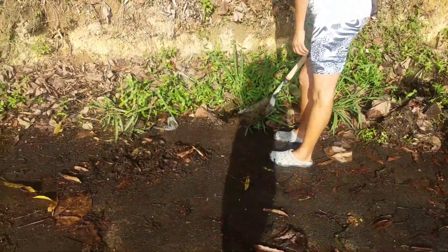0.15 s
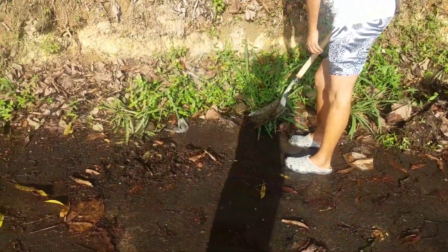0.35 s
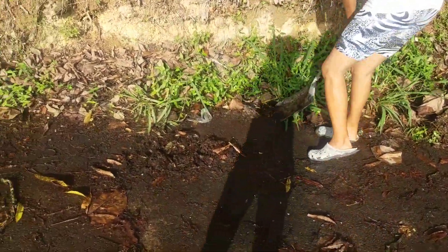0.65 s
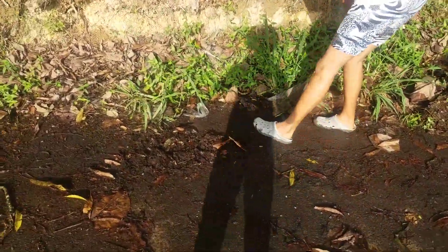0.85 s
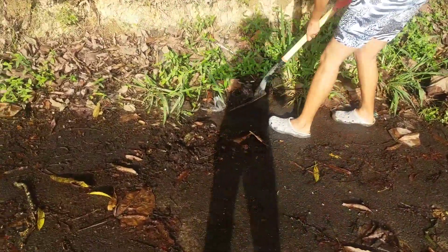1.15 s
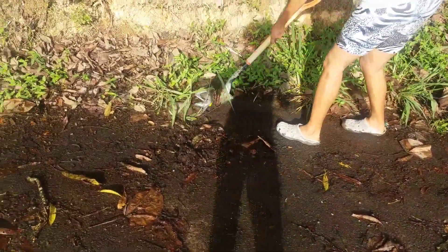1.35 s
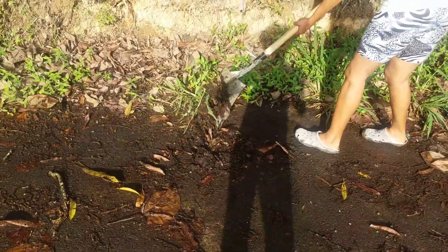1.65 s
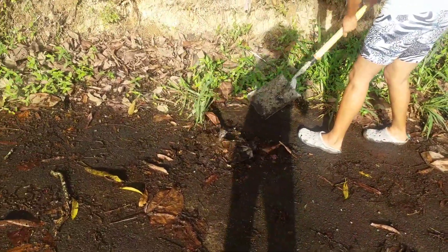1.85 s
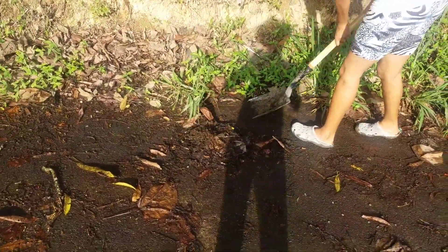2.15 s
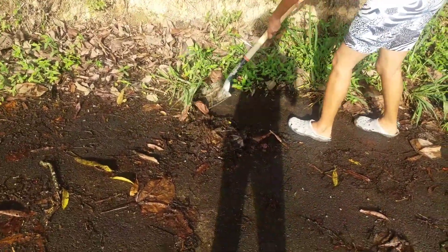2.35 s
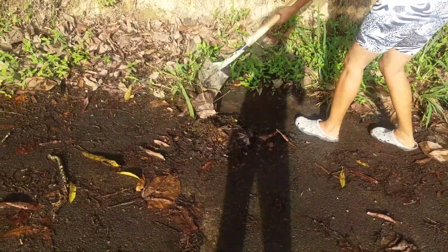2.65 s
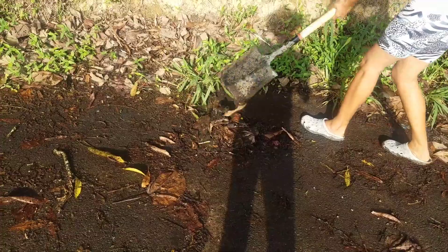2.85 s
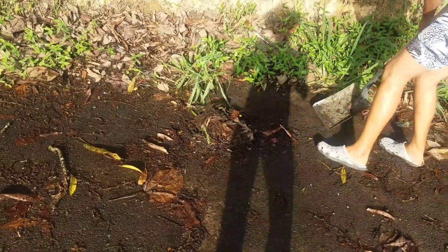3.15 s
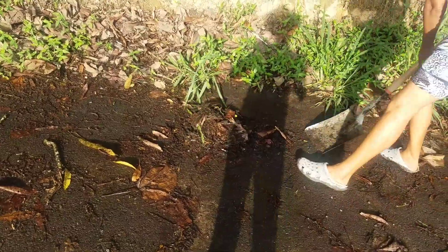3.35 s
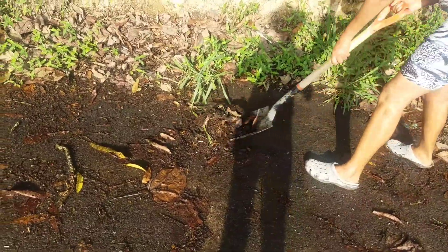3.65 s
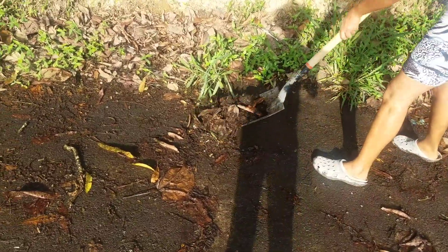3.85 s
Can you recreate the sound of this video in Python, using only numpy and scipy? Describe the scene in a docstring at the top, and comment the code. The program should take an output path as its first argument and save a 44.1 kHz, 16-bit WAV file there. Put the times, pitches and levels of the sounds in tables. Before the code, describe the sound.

A steel shovel scrapes wet soil and leaves about two metres away, slightly left. Small crunches come at 0.1 and 0.7 s, then gritty, dully ringing scrapes at 0.85-1.4, 2.0-2.4 and 3.25-3.7 s. Knocks begin the second and third; a crunch and soft low thud land near 3.2 s. Crumbs trickle faintly between strokes over quiet outdoor air and faint insects.

```python
"""By a road outdoors, a steel shovel is pushed three times through wet soil and leaves, a couple of metres away.
Scrape: grains of noise ring the soil-damped modes of the blade and add a gritty hiss.
Knocks: short pushes ring the same modes, and one soft thud is a low tone that sags.
Crunches and trickle: bursts and streams of noise grains for clods, crumbs and leaves, mostly between strokes.
Behind them lies a quiet outdoor hush: shaped noise with a faint insect band."""
import sys
import numpy as np
from scipy import signal
from scipy.fft import rfft, irfft
from scipy.io import wavfile
from scipy.ndimage import uniform_filter1d

SR = 44100
rng = np.random.default_rng(int(sys.argv[2]) if len(sys.argv) > 2 else 0)


def generate_wav(sig):
    """Save sig (samples, or channels by samples) to the path in sys.argv[1] as 16-bit PCM at SR."""
    pcm = np.round(np.clip(np.atleast_2d(sig).T, -1, 1) * 32767).astype(np.int16)
    wavfile.write(sys.argv[1], SR, pcm)


N = 176400  # 4 s of samples
T = np.arange(N) / SR  # time, s
F = np.maximum(np.arange(N // 2 + 1) * SR / N, 1)  # frequency, Hz

# All levels apply before the stereo balance and the final filters.
# The three pushes of the shovel. Each row: time in seconds, level of the blade's upper ring in dB.
STROKES = [
    [(0.836, -67), (0.843, -41.5), (0.872, -44.5), (0.885, -61), (0.907, -52), (0.911, -42.5), (0.978, -42),
     (1.015, -31.5), (1.04, -40.5), (1.11, -31), (1.18, -33.5), (1.21, -32), (1.29, -38), (1.335, -45),
     (1.39, -47.5), (1.42, -74)],
    [(1.99, -50.5), (2.05, -47.5), (2.08, -34.5), (2.14, -29.5), (2.24, -29.5), (2.29, -29), (2.32, -35.5),
     (2.36, -44.5), (2.405, -50), (2.43, -68)],
    [(3.251, -42.5), (3.285, -41.5), (3.315, -33), (3.37, -32.5), (3.41, -28.5), (3.46, -28.5), (3.55, -29),
     (3.63, -33.5), (3.65, -49), (3.69, -58), (3.74, -74)],
]
# How far each stroke sits to the left: left over right in dB, one value per stroke.
STROKE_PANS = [3, 3, 3]
# Colour as the blade loads, one list per stroke. Each row: time in seconds, then the low ring, the middle
# ring and the grit hiss in dB relative to the upper ring, then how far the higher modes outweigh the
# lower ones inside the middle ring in dB, and the same inside the upper ring in dB.
LOADING = [
    [(0.93, -34, -8, -0.3, 2.5, 0.5), (1.05, -11.5, -5.5, 0.9, -3, -5), (1.2, -15, -8.5, -1.5, 6.5, 7),
     (1.32, -10.5, -2, 4, -9, -1.5), (1.4, -14, 8, -9, -7, 8)],
    [(2.03, -9, -2.5, -4, 3, 7), (2.12, -19, -14, 0, 1, -0.5), (2.25, -17, -6, -2, 5.5, 3),
     (2.4, -12.5, -8.5, 2, -4, 1)],
    [(3.27, -10.5, 3, -3.5, 3.5, 0), (3.4, -7, -3, -3.5, -1, -3), (3.55, -9.5, -5, -1, 4.5, 2),
     (3.66, -24, -7, -1.5, 2, -2)],
]
# Stones that snag the edge. Each row: time in seconds, size of the added burst in dB over the stroke's level.
SNAGS = [(0.912, 12), (0.92, 5), (0.937, 7), (0.961, 7), (0.985, 14), (1.007, -2), (1.153, 0), (1.355, 9),
         (2.336, 2), (3.4, 3.5), (3.583, 2)]
SNAG_DECAY_S = 0.0054

# Ringing modes of the blade. Each row: pitch in Hz, relative level in dB,
# time to fade by 60 dB in seconds when the blade hangs free.
BLADE_MODES = [(375, -5.5, 0.14), (397.7, -4, 0.21), (476, -12.5, 0.19), (653, 2.5, 0.037),
               (718, 1.5, 0.058), (879, 0, 0.089), (896.4, -1.5, 0.11), (1154, 9, 0.13), (1547, 6.5, 0.22),
               (1803, 4.5, 0.13), (1868, 6.5, 0.12), (2072, 1, 0.24), (2260, 4, 0.081)]
SOIL_DAMPING = 1.7  # fade times are divided by this during the scrape
LOW_TOP_HZ, MIDDLE_TOP_HZ = 550, 1050  # borders of the three groups of modes
MIDDLE_SPLIT_HZ, UPPER_SPLIT_HZ = 790, 1700  # where weight shifts inside a group
MODE_FLICKER_DB = 7  # dB per unit of walk()
RUMBLE_DB = 1.5  # broad noise between the modes, relative to the ringing
SCRAPE_LOW_HZ = 215  # the scrape is thinned below this
# Colour of the noise between the modes. Each row: frequency in Hz, relative level in dB.
EDGE_COLOUR = [(130, -32.5), (250, -14.5), (400, 9), (540, -25), (850, -4), (1100, -16.5), (1600, -7),
               (2800, -17.5)]
# Colour of grit hiss and of all crisp treble. Each row: frequency in Hz, relative level in dB.
GRIT_COLOUR = [(2000, -6.5), (2750, -9.5), (3300, -8), (5500, -10.5), (8000, -17), (10300, -16.5),
               (14000, -10), (16000, -14)]

# Knocks of the blade. Each row: time in seconds, level in dB, time for the push to peak in seconds,
# damping that divides the fade times (0.3 at least), pitch in Hz of the modes the struck spot favours.
KNOCKS = [(0.737, -46.5, 0.00013, 0.39, 920), (0.741, -53, 0.000091, 1.2, 1535),
          (1.958, -24, 0.00013, 1.37, 772), (2.639, -58.5, 0.00011, 1.7, 914),
          (3.2475, -28, 0.00011, 2.9, 873)]
FAVOUR_DB_PER_OCTAVE, FAVOUR_FLOOR_DB = -51.5, -20  # loss of modes away from the favoured pitch
KNOCK_CLICK_DB = -20
# The loaded blade drops on soft ground.
THUD_S, THUD_DB, THUD_HZ, THUD_T60_S = 3.1945, -24, 400, 0.02
THUD_SAG = 18  # per second; larger makes the pitch fall faster

# Crunches of clods and leaves. Each row: time in seconds, length in seconds, level in dB,
# centre of the band in Hz, treble relative to that level in dB.
CRUNCHES = [(.0, 0.029, -60, 740, -3), (.099, 0.0011, -32.5, 1690, -26), (0.108, 0.008, -40, 1380, -6.5),
            (0.117, 0.033, -35, 2330, -11), (0.357, 0.095, -66.5, 1310, -18), (0.5, 0.03, -66, 1520, -3),
            (0.561, 0.0079, -59, 1390, 0), (.655, 0.031, -52.5, 1620, -13),
            (0.669, 0.0058, -45.5, 1440, -1.5), (0.694, 0.06, -49.5, 2240, -12.5),
            (.719, 0.0037, -48.5, 2070, -1), (1.732, 0.047, -59.5, 1640, 3),
            (1.784, 0.018, -53.5, 1320, -0.5), (2.769, 0.0066, -59.5, 1530, 0.5),
            (2.894, 0.003, -53.5, 1600, -20), (2.814, 0.018, -53.5, 1640, -6.5),
            (2.925, 0.033, -49, 1960, -12), (3.068, 0.0064, -48, 1360, -24),
            (3.181, 0.015, -34.5, 2400, -10), (3.197, 0.0023, -27, 1750, -9), (3.2, 0.039, -48, 1920, -7.5),
            (3.512, 0.0061, -38.5, 2540, 17)]
CRUNCH_WIDTH, CRUNCH_TAIL_S = 0.25, 0.0068  # band reaches a factor of 1.25 each way
# Soil sliding off and leaves rustling, one list per stretch. Each row: time in seconds,
# level in dB, treble level in dB.
TRICKLE = [
    [(0.03, -67, -74), (0.2, -106, -94), (0.62, -76, -73), (0.8, -65, -69)],
    [(1.385, -65, -59.5), (1.5, -68.5, -59.5), (1.6, -73, -72), (1.7, -71, -68.5), (1.83, -78, -74),
     (1.93, -106, -103)],
    [(2.4, -66.5, -69), (2.55, -59, -54), (2.63, -70, -67.5), (2.87, -70.5, -71.5), (3.12, -67, -70),
     (3.16, -109, -96)],
    [(3.7, -80, -68), (3.8, -67.5, -69), (3.97, -74, -69.5)],
]
# Colour of the trickle's lower part. Each row: frequency in Hz, relative level in dB.
TRICKLE_COLOUR = [(300, -1.5), (700, 1), (1500, 6), (2500, -5), (3500, -80)]

# Colour of the outdoor air. Each row: frequency in Hz, relative level in dB.
HUSH_COLOUR = [(22, 1), (65, 10.5), (150, -0.5), (400, -2), (900, -6), (1700, -7.5), (5000, -16.5),
               (8000, -25.5), (13000, -18.5), (16000, -15.5)]
HUSH_DB = -66.5
INSECT_HZ, INSECT_WIDTH_HZ, INSECT_DB = 6260, 1500, -78.5  # width is on each side
INSECT_WAVER_DB = 1.5  # dB per unit of walk()

# How alike the two ears hear a nearby source. Each row: frequency in Hz, likeness from 0 to 1.
LIKENESS = [(60, 0.5), (300, 0.92), (800, 0.95), (1500, 1), (3000, 0), (15000, 0)]
# Stereo balance. Each row: frequency in Hz, left over right in dB.
BALANCE = [(60, -1.7), (1200, 3), (2500, 1), (5000, -1.5), (14000, -2.5)]
LEFT_LAG_S = 0.00011
MIC_LOW_HZ, MIC_TOP_HZ = 48.7, 15850


def undb(db):
    """Turn dB into a gain."""
    return 10 ** (np.asarray(db) / 20)


def unit(x):
    """Scale to an rms of 1."""
    return x / np.sqrt(np.mean(x ** 2))


def on_log(points, hz=F):
    """Read (Hz, value) points along a logarithmic frequency axis."""
    p = np.array(points, float)
    return np.interp(np.log(hz), np.log(p[:, 0]), p[:, 1])


def keep_band(x, low_hz, high_hz):
    """Keep only the frequencies from low_hz up to high_hz."""
    return irfft(rfft(x) * ((F >= low_hz) & (F < high_hz)), N)


def colour(x, points):
    """Shape by (Hz, dB) points, silent outside them; white noise of rms 1 keeps about that rms."""
    inside = (F >= points[0][0]) & (F <= points[-1][0])
    gain = undb(on_log(points)) * inside
    return irfft(rfft(x) * unit(gain), N)


def ring(x, hz, t60):
    """One mode set ringing by x, a tone that fades by 60 dB in t60 seconds."""
    pole = np.exp(2j * np.pi * hz / SR - np.log(1000) / (t60 * SR))
    return signal.lfilter([1], [1, -pole], x).imag


def walk(rate):
    """Random levels, about rate new ones a second, with smooth steps; their spread is near a half."""
    held = int(SR / rate)
    levels = np.repeat(rng.standard_normal(N // held + 1), held)
    return 0.58 * uniform_filter1d(levels, held // 2 + 1)[:N]


def grains(rate, spread_db, tail_s, n=N):
    """Two noises under one envelope of random grains with sharp starts and short tails."""
    sizes = undb(spread_db * np.minimum(rng.exponential(size=n), 3))
    hits = (rng.random(n) < rate / SR) * sizes
    hits[0] += 1.5  # there is always at least one grain
    envelope = signal.lfilter([1], [1, -np.exp(-1 / (tail_s * SR))], hits)
    return unit(envelope * rng.standard_normal((2, n)))


def curve(table, column, outside_db=-120):
    p = np.array(table, float)
    return undb(np.interp(T, p[:, 0], p[:, column], left=outside_db, right=outside_db))


def lean(x, split_hz, tilt):
    """Shift weight between the modes below and above the split, roughly keeping the power."""
    below = irfft(rfft(x) * (F < split_hz), N)
    return (below + tilt * (x - below)) / np.sqrt((1 + tilt ** 2) / 2)


def stereo(pair, pan_db, lag_s, likeness):
    """Right hears a share of the left sound, earlier, plus a share of its own."""
    a, b = rfft(pair)
    shared = np.clip(on_log(likeness), 0, 1)
    gain = undb((on_log(BALANCE) + pan_db) / 2)
    left = a * gain * np.exp(-2j * np.pi * F * lag_s)
    right = (shared * a + np.sqrt(1 - shared * shared) * b) / gain
    return irfft(np.array([left, right]), N)


def grit(clumps):
    """Grit under the edge: dense noise grains that swell in the given clumps and flicker on their own."""
    return grains(rate=2900, spread_db=5, tail_s=0.0044) * clumps * undb(1.7 * walk(30))


def blade_group(x, low_hz, high_hz):
    """Grit x rings the blade modes of one band, each flickering, with broad noise between them."""
    rings = 0
    for k, (hz, db, t60) in enumerate(BLADE_MODES):
        if low_hz <= hz < high_hz:
            level = undb(db + MODE_FLICKER_DB * walk(19))
            mode = unit(ring(x, hz, t60 / SOIL_DAMPING))
            rings = rings + (-1) ** k * level * mode  # neighbours have opposite signs
    rumble = unit(keep_band(colour(x, EDGE_COLOUR), low_hz, high_hz))
    return unit(unit(rings) + undb(RUMBLE_DB) * rumble)


def grit_hiss(x):
    """Grit noise cut into narrow slices, each flaring on its own."""
    fizz = colour(x, GRIT_COLOUR)
    edges = np.geomspace(1500, 17000, num=19)  # Hz
    return unit(sum(undb(3.86 * walk(24.916)) * keep_band(fizz, a, b) for a, b in zip(edges, edges[1:])))


def scrape():
    """Grit catches the edge in clumps and snags: it rings three groups of modes and hisses."""
    clumps = undb(0.83 * walk(60))
    low = blade_group(grit(clumps), 0, LOW_TOP_HZ)
    middle = blade_group(grit(clumps), LOW_TOP_HZ, MIDDLE_TOP_HZ)
    upper = blade_group(grit(clumps), MIDDLE_TOP_HZ, SR)
    hiss = grit_hiss(grit(clumps))
    catch = 1
    for s, db in SNAGS:
        catch = catch + undb(db) * (T > s) * np.exp(-np.abs(T - s) / SNAG_DECAY_S)
    out = 0
    for stroke, load, pan_db in zip(STROKES, LOADING, STROKE_PANS):
        low_gain, middle_gain, hiss_gain, lean_middle, lean_upper = (curve(load, c, None) for c in range(1, 6))
        blade = low_gain * low
        blade = blade + middle_gain * lean(middle, MIDDLE_SPLIT_HZ, lean_middle)
        blade = blade + lean(upper, UPPER_SPLIT_HZ, lean_upper)
        sound = curve(stroke, 1) * catch * (blade + hiss_gain * hiss)
        out = out + stereo(sound, pan_db, LEFT_LAG_S, LIKENESS)
    return signal.sosfilt(signal.butter(4, SCRAPE_LOW_HZ, "high", fs=SR, output="sos"), out)


def blade_knocks():
    """A short push rings the blade; longer contact is duller, and each spot favours some modes."""
    out, u = np.zeros(N), np.arange(SR // 4) / SR
    for s, db, contact, damping, favoured in KNOCKS:
        push = u * np.exp(-u / contact)
        roughness = rng.standard_normal(len(u)) * np.exp(-u / 0.011)  # grit roughens the blow
        push = push / push.sum() + undb(-26.5) * roughness
        body = 0
        for hz, mode_db, t60 in BLADE_MODES:
            favour_db = max(FAVOUR_DB_PER_OCTAVE * abs(np.log2(hz / favoured)), FAVOUR_FLOOR_DB)
            body = body + undb(mode_db + favour_db) * ring(push, hz, t60 / max(damping, 0.3))
        fade = np.exp(-u / 0.012) + 0.079 * np.exp(-u / 0.021)
        click = undb(KNOCK_CLICK_DB) * rng.standard_normal(len(u)) * fade
        i = int(s * SR)
        out[i:i + len(u)] += undb(db) * (body + click)
    return out


def thud():
    """The loaded blade drops on soft ground: a brief low tone with a soft start and a sagging pitch."""
    u = np.maximum(T - THUD_S, 0)
    tone = np.sin(2 * np.pi * THUD_HZ * u / (1 + THUD_SAG * u))
    return undb(THUD_DB) * tone * (1 - np.exp(-u / 0.002)) * 1000. ** (-u / THUD_T60_S)


def knocks():
    """Blade knocks and thud with thin bass, paired with a slightly later copy for the right's own share."""
    out = signal.sosfilt(signal.butter(2, 90, "high", fs=SR, output="sos"), blade_knocks() + thud())
    return np.array([out, np.roll(out, 60)])


def crunches():
    """Clods and leaves give way in many tiny breaks: bursts of grains in a band, with a crisp top."""
    body, top = np.zeros((2, 2, N))
    n = SR // 5
    u = np.arange(n) / SR
    for s, length, db, hz, treble_db in CRUNCHES:
        x = grains(rate=1800, spread_db=3, tail_s=0.0011, n=n)
        x = x / x[:, :int(length * SR) + 2].std()  # even loudness over the burst's length
        rise = np.minimum(u / (0.18 * length + 0.0015), 1)
        fall = np.exp(-0.6 * u / length - np.maximum(u - length, 0) / CRUNCH_TAIL_S)
        x = x * rise * fall
        limits = [hz / (1 + CRUNCH_WIDTH), hz * (1 + CRUNCH_WIDTH)]
        band = signal.butter(1, limits, "band", fs=SR, output="sos")
        band = np.vstack([band, signal.butter(4, 1.97 * hz, fs=SR, output="sos")])  # steeper cut above
        i = max(int(s * SR), 0)
        # the square root lifts low bands, which pass less of the noise
        body[:, i:i + n] += undb(db) * signal.sosfilt(band, x) * np.sqrt(SR / hz)
        top[:, i:i + n] += undb(db + treble_db) * x
    return body + colour(top, GRIT_COLOUR)


def trickle():
    """Fine crumbs and leaves, mostly between strokes: a stream of grains, with lone ticks in the lower part."""
    crumbs = grains(rate=1500, spread_db=4, tail_s=0.005) * undb(1.5 * walk(27))
    ticks = undb(-7) * grains(rate=35, spread_db=3, tail_s=0.0015)
    lower = colour(crumbs + ticks, TRICKLE_COLOUR)
    treble = colour(crumbs, GRIT_COLOUR)
    return sum(curve(s, 1) * lower + curve(s, 2) * treble for s in TRICKLE)


def hush():
    """Distant outdoor air as shaped noise, and a faint wavering insect band."""
    air = undb(HUSH_DB + 0.5 * walk(6.1)) * colour(rng.standard_normal((2, N)), HUSH_COLOUR)
    band = [(INSECT_HZ - INSECT_WIDTH_HZ, -20), (INSECT_HZ, 0), (INSECT_HZ + INSECT_WIDTH_HZ, -20)]
    insects = colour(rng.standard_normal((2, N)), band)
    return air + undb(INSECT_DB + INSECT_WAVER_DB * walk(31)) * insects


def scene():
    """Place every source between left and right and add them up."""
    hush_likeness = [(40, 0.78), (300, 0.22), (2000, 0.083), (15000, 0.12)]  # (Hz, 0 to 1)
    out = scrape()
    out = out + stereo(knocks(), 3.8, LEFT_LAG_S, LIKENESS)
    out = out + stereo(crunches() + trickle(), 5.3, 0.00006, LIKENESS)
    return out + stereo(hush(), 0.97, 0.00001, hush_likeness)


def record(dry):
    """The phone's microphone thins the deep bass and cuts the top."""
    thin = signal.sosfilt(signal.butter(2, MIC_LOW_HZ, "high", fs=SR, output="sos"), dry)
    return signal.sosfilt(signal.ellip(10, 0.2, 75, MIC_TOP_HZ, fs=SR, output="sos"), thin)


dry = scene()
out = record(dry)
generate_wav(out)
```